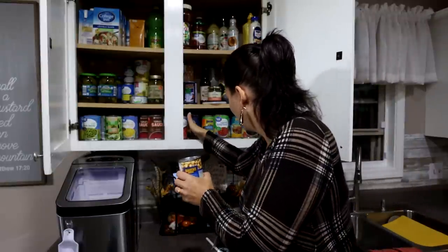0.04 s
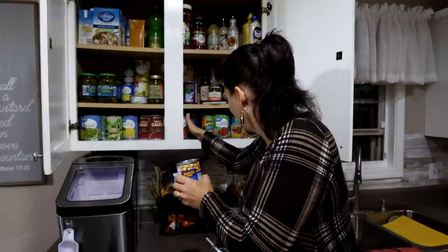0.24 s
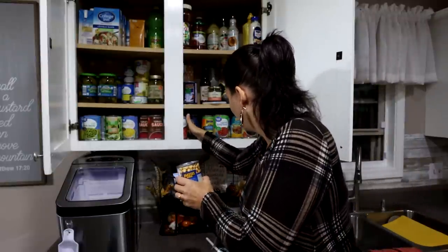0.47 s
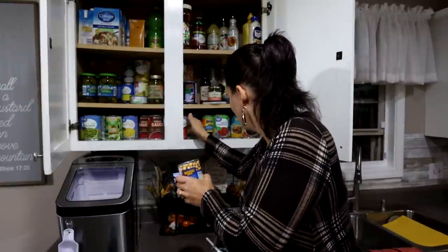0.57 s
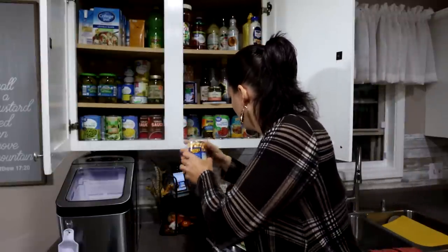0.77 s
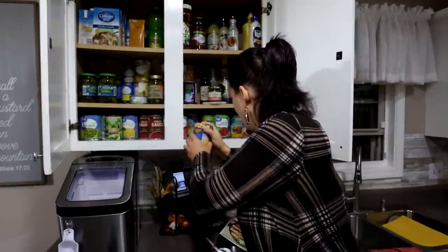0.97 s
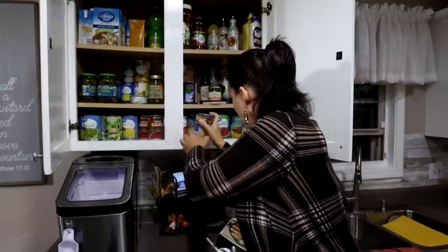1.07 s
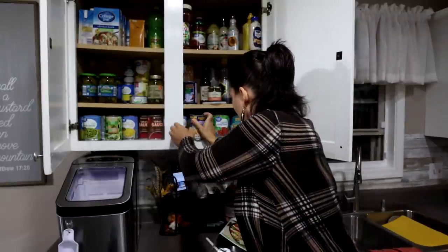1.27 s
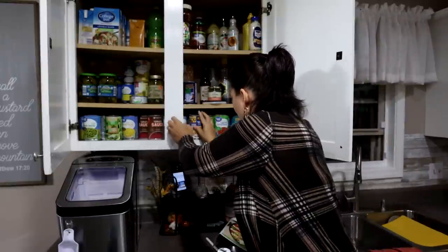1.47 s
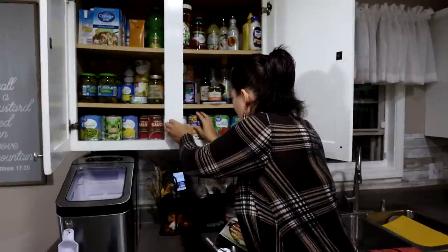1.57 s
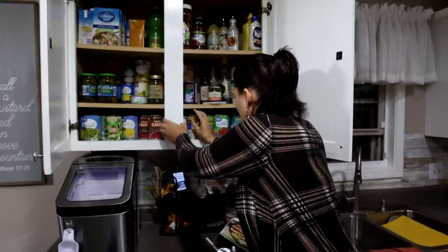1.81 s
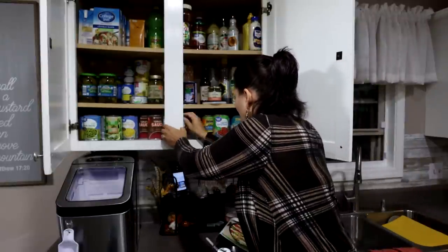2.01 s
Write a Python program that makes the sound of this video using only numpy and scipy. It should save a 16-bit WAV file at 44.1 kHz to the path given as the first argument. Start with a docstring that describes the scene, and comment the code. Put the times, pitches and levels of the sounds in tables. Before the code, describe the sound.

Metal cans and jars knock on a wooden cupboard shelf: a quick cluster of thuds first, a lighter clink, then heavier hollow clunks, with soft sliding, close to the microphone in a small, reflective kitchen.

```python
"""A small kitchen: cans and jars are set down and shuffled on a wooden cupboard shelf.
Each knock sounds shelf, room and cupboard resonances and the can's note, with a noise clatter.
Soft bumps, thin ticks, sliding, a sleeve's rustle and a sinking scrape are notes or shaped noise.
Room tone and an appliance's sine hum lie beneath; a noise tail makes the room's reflections.
The microphone flattens the loudest peaks."""
import sys
import numpy as np
from scipy import signal
from scipy.fft import rfft, irfft
from scipy.io import wavfile
from scipy.ndimage import uniform_filter1d

SR = 44100
rng = np.random.default_rng(int(sys.argv[2]) if len(sys.argv) > 2 else 0)


def persist_wave(psi):
    """Save psi, clipped to +-1, as 16-bit WAV."""
    counts = np.round(np.clip(psi, -1, 1) * 32767).astype(np.int16)
    wavfile.write(sys.argv[1], SR, np.atleast_2d(counts).T)


N = 90404
TIME_S = np.arange(N) / SR
EDGES_HZ = 28 * 2 ** np.arange(0, 9.6, .5)  # half-octave band edges

# room tone: (frequency [Hz], level [dB per band])
AIR_BANDS = [(30, -111), (60, -64.5), (100, -55.5), (200, -73.5), (600, -54.5), (1500, -67), (4000, -76),
             (8000, -79.5), (15000, -80)]
# appliance hum: (time [s], rms level before waver [dB])
HUM_CURVE = [(0, -81), (.7, -55), (1.0, -53.5), (1.25, -46), (1.45, -52), (2.05, -57.5)]
HUM_HZ, HUM_WAVER_DB = 385.5, 1

# sliding: (time [s], level [dB])
SLIDE_CURVE = [(0, -42), (.09, -42.5), (.15, -37.5), (.2, -37.5), (.26, -79), (.6, -50), (.8, -51.5),
               (.95, -51), (1.1, -52), (1.28, -45), (1.6, -46), (1.75, -36.5), (1.86, -53.5), (2.05, -60)]
# sliding colour: (frequency [Hz], relative level [dB per band])
SLIDE_BANDS = [(80, -2), (300, 0), (900, 5.5), (2000, -0.5), (4000, 2), (8000, -9), (15000, -31)]
SLIDE_COMMON_FLICKER_DB, SLIDE_BAND_FLICKER_DB = 1.65, 3.15

# soft bumps of a hand on a can: (time [s], level before swell [dB], pitch [Hz], t60 [s])
HAND_BUMPS = [(0.048, -19.5, 650, 0.034), (0.056, -23.5, 546, 0.043), (0.833, -23.5, 337, 0.051),
              (0.833, -27, 463, 0.025), (0.866, -31.5, 366, 0.056), (1.641, -21.5, 450, 0.18)]

# thin rustle of a sleeve: (time [s], level [dB])
RUSTLE_CURVE = [(0, -77), (.07, -62), (.17, -55), (.25, -83), (.8, -75), (.87, -60.5), (1.02, -61.5),
                (1.15, -68.5), (1.42, -63), (1.47, -61), (1.53, -71), (2.05, -100)]
RUSTLE_LOW_HZ, RUSTLE_GRAIN_DB = 6240, 1.5

# knocks: (time [s], thud [dB], wood [dB], clank [dB], clack [dB], tick [dB],
#          shelf pitch shift [semitones], can's own note [Hz], note level before swell [dB])
KNOCK_EVENTS = [(0.101, -23.5, -28, -35, -31.5, -33.5, 0.79, 676, -20),
                (0.123, -19.5, -28.5, -37, -39, -58, 0.023, 418, -24),
                (0.176, -17, -32, -38, -36, -43, 0.76, 680, -32),
                (0.195, -14, -14.5, -16, -17.5, -22.5, -0.17, 173.5, -3),
                (0.203, -25.5, -10.5, -20, -20.5, -31, 0.26, 632, -5),
                (0.210, -29, -8.5, -52, -44, -48, 0.025, 410, -27),
                (0.579, -30.5, -39, -37, -43, -51, -1.2, 670, -29),
                (0.591, -50, -16, -22, -25.5, -37, -0.22, 1182, -17.5),
                (1.29, -12.5, -11.5, -13.5, -20, -27.5, 0.92, 352, -7),
                (1.314, -12.5, -16.5, -24, -34, -48, -0.098, 354, -15),
                (1.374, -29, -14.5, -8, -16, -35, 0.18, 659.4, -3.5),
                (1.422, -20.5, -18.5, -14.5, -21.5, -43, 0.26, 945, -15),
                (1.629, -29, -21.5, -32.5, -31.5, -30, -0.64, 560, -17),
                (1.679, -27.5, -23, -21, -30, -29.5, -1.1, 960, -20),
                (1.697, -19, -20, -4, -11.5, -31.5, -0.73, 1081, -3.5),
                (1.717, -30, -11.5, -24.5, -22, -44, 0.57, 826, -19),
                (1.754, -26, -25.5, -23, -28, -61, 0.58, 1153, -24),
                (2.032, -35.5, -42, -24, -32, -33, 0.045, 1760, -46),
                (2.036, -50, -31, -26.5, -36, -44, -0.84, 584, -16)]
# where the five knock levels apply, thud to tick: (frequency [Hz])
KNOCK_COLOUR_HZ = [150, 520, 1250, 3000, 7500]
# loaded shelf: (frequency before shift [Hz], level relative to knock [dB], t60 [s])
SHELF_MODES = [(104.6, -7.5, 0.072), (175.4, 0, 0.062), (244.6, -8, 0.11), (289.4, -12.5, 0.047),
               (394, -2.5, 0.1), (493, -11, 0.1), (639.6, 3, 0.056), (687, 6.5, 0.062), (910, 8, 0.013),
               (1066.4, 0.5, 0.039), (1134, -14, 0.031), (1562, -1, 0.019), (1936, -17, 0.057),
               (2634, -21, 0.075)]
# room and cupboard resonances ringing on: (frequency [Hz], level relative to knock [dB], t60 [s])
ROOM_MODES = [(181.4, -4.5, 0.23), (249, -13.5, 0.36), (374.3, -7, 0.12), (648, -20, 0.14),
              (814, -4, 0.093), (854.4, -18, 0.2), (899.5, -18, 0.13), (1070, -18.5, 0.12),
              (1406, -15, 0.15), (1505, -21.5, 0.13), (1876, -20, 0.093), (3170, -18.5, 0.086),
              (5500, -11.5, 0.053), (8400, -24, .06)]
# dense short ring of the contact: (frequency [Hz], level relative to knock [dB], t60 [s])
CLATTER_BANDS = [(46.6, -39.5, 0.094), (123, -21.5, 0.18), (378, -9.5, 0.066), (880, -8, 0.15),
                 (1790, -6, 0.048), (3740, -9.5, 0.042), (6500, -9, 0.043), (14800, -23, 0.042)]
MODE_SCATTER_DB = 2
NOTE_T60_S, ATTACK_S, MAX_RING_S = 0.053, 0.00096, .45

# extra notes that start with or just after a knock, short or long:
# (time [s], level before swell [dB], pitch [Hz], t60 [s])
KNOCK_RINGS = [(0.102, -38, 97, .22), (0.196, -22, 138.5, .2), (0.203, -28, 680, 0.13),
               (0.591, -11, 652, 0.069), (0.591, -19.5, 1188, 0.052), (0.605, -35, 99, 0.21),
               (1.290, -7, 700, 0.032), (1.290, -17.5, 494, 0.12), (1.290, -26, 113, 0.15),
               (1.374, -20.5, 243.7, 0.31), (1.374, -24, 1085, 0.094), (1.697, -24, 319, 0.32),
               (1.697, -21.5, 99, 0.11), (1.697, -16.5, 917, .2)]

# can sliding into the next: (time [s], level [dB], pitch [Hz])
SCRAPE_CURVE = [(.4, -78, 3700), (.46, -62, 3530), (0.539, -60, 3110), (.575, -63, 2900), (.6, -85, 2900)]
SCRAPE_LOWPASS_HZ = 120  # half-width of the hiss band

# light rim ticks: (time [s], level [dB])
RIM_TICKS = [(0.663, -49.5), (0.833, -56), (0.867, -49.5), (0.878, -49), (0.888, -55), (1.392, -40.5)]
TICK_T60_S, TICK_LOW_HZ, TICK_HIGH_HZ = 0.046, 3570, 9000

# kitchen reflections: (frequency [Hz], level against direct sound [dB per Hz], t60 [s])
ROOM_BANDS = [(48.3, -10.5, 0.63), (106, -5.5, 0.2), (306, -7, 0.48), (700, -9.5, 0.39), (1350, -8, .48),
              (2850, -6.5, 0.47), (6900, -11.5, 0.25), (14900, -20.5, 0.35)]
ROOM_DELAY_S, ROOM_BUILD_S = 0.0024, 0.014
ROOM_GRAIN_DB, ROOM_EVEN_HZ = 2.0, 35  # unevenness in time; width of colour smoothing

LOW_CUT_HZ, CUTOFF_HZ = 70, 16000
OVERLOAD_PEAK = 1.05


def from_db(db):
    """Decibels to amplitude gain."""
    return 10 ** (np.asarray(db) / 20)


def at_hz(rows, hz, axis=1):
    """Read one table column on a log-frequency axis."""
    rows = np.array(rows)
    return np.interp(np.log(hz), np.log(rows[:, 0]), rows[:, axis])


def level(rows):
    """A (time [s], level [dB]) curve as gain per sample."""
    return from_db(np.interp(TIME_S, *np.transpose(rows)))


def drift(count):
    """Random wander about 0: straight lines through count unit-normal points."""
    points_s = np.linspace(0, N / SR, count)
    return np.interp(TIME_S, points_s, rng.standard_normal(count))


def band_pass(x, low_hz, high_hz):
    """Causal Butterworth band."""
    sos = signal.butter(2, [low_hz, high_hz], "band", fs=SR, output="sos")
    return signal.sosfilt(sos, x)


def noise_bands():
    """Half-octave noise, unit deviation: (centre [Hz], share of full bandwidth, noise)."""
    for low_hz, high_hz in zip(EDGES_HZ, EDGES_HZ[1:]):
        band = band_pass(rng.standard_normal(N + 8000), low_hz, high_hz)[-N:]  # skip filter onset
        yield np.sqrt(low_hz * high_hz), 2 * (high_hz - low_hz) / SR, band / band.std()


def clicks(times_s, db):
    """One impulse per contact."""
    out = np.full(N, 1e-18)  # tiny floor
    index = np.clip(np.round(times_s * SR).astype(int), 0, N - 1)
    np.add.at(out, index, from_db(db))
    return out


def fade(t60_s):
    """Gain per sample of a ring that falls 60 dB in t60_s."""
    return np.exp(-np.log(1000) / (t60_s * SR))


def die_away(x, t60_s):
    """Each click opens an exponentially decaying envelope."""
    return signal.lfilter([1], [1, -fade(t60_s)], x)


def add(out, start_s, sound):
    """Mix a sound in at its time."""
    start = int(np.clip(round(start_s * SR), 0, N - 1))
    out[start:start + len(sound)] += sound[:N - start]


def mode(hz, db, t60_s):
    """A sine that swells during contact while it decays."""
    t_s = TIME_S[:int(min(1.5 * t60_s, MAX_RING_S) * SR) + 1]
    swell = 1 - np.exp(-t_s / ATTACK_S)
    decay = np.exp(-np.log(1000) * t_s / t60_s)
    return from_db(db) * np.sin(2 * np.pi * hz * t_s) * swell * decay


def strength_db(colour_db, hz):
    """How hard a knock drives this frequency."""
    return np.interp(np.log(hz), np.log(KNOCK_COLOUR_HZ), colour_db)


def background():
    """Band-shaped noise as room tone, a wavering sine as appliance hum."""
    air = sum(noise * from_db(at_hz(AIR_BANDS, hz)) for hz, _, noise in noise_bands())
    hum = np.sqrt(2) * np.sin(2 * np.pi * HUM_HZ * TIME_S)  # rms 1
    waver = from_db(HUM_WAVER_DB * drift(20))
    return air + hum * level(HUM_CURVE) * waver


def sliding():
    """Tins and a sleeve rub along the shelf: noise bands flicker together and apart."""
    common_db = SLIDE_COMMON_FLICKER_DB * drift(120)
    rub = np.zeros(N)
    for hz, _, noise in noise_bands():
        flicker_db = common_db + SLIDE_BAND_FLICKER_DB * drift(60)
        rub += noise * from_db(at_hz(SLIDE_BANDS, hz) + flicker_db)
    return rub / rub.std() * level(SLIDE_CURVE)


def notes(rows):
    """Single decaying notes: soft bumps of a hand, or extra notes around a knock."""
    out = np.zeros(N)
    for start_s, db, hz, t60_s in rows:
        add(out, start_s, mode(hz, db, t60_s))
    return out


def rustle():
    """A sleeve brushes the shelf edge: treble noise with a fine, grainy level."""
    hiss = band_pass(rng.standard_normal(N), RUSTLE_LOW_HZ, CUTOFF_HZ)
    hiss = hiss * from_db(RUSTLE_GRAIN_DB * drift(500))
    return hiss / hiss.std() * level(RUSTLE_CURVE)


def knocks():
    """Each blow rings the shelf, shifted in pitch by its load, fixed resonances and the can's note."""
    out = np.zeros(N)
    for start_s, *colour_db, semitones, note_hz, note_db in KNOCK_EVENTS:
        shift = 2 ** (semitones / 12)
        shelf = [(hz * shift, db, t60_s) for hz, db, t60_s in SHELF_MODES]
        for k, (hz, db, t60_s) in enumerate(shelf + ROOM_MODES):
            scatter_db = MODE_SCATTER_DB * rng.standard_normal()
            ring = mode(hz, db + strength_db(colour_db, hz) + scatter_db, t60_s)
            add(out, start_s, (-1) ** k * ring)  # alternate polarity
        add(out, start_s, mode(note_hz, note_db, NOTE_T60_S))
    return out


def clatter():
    """Countless short modes of each knock as noise bursts, each band with its own decay."""
    out = np.zeros(N)
    times_s = np.array([row[0] for row in KNOCK_EVENTS])
    for low_hz, high_hz in zip(EDGES_HZ, EDGES_HZ[1:]):
        hz = np.sqrt(low_hz * high_hz)
        band_db = at_hz(CLATTER_BANDS, hz)
        db = [strength_db(colour_db, hz) + band_db for _, *colour_db, _, _, _ in KNOCK_EVENTS]
        envelope = die_away(clicks(times_s, db), at_hz(CLATTER_BANDS, hz, axis=2))
        burst = envelope * rng.standard_normal(N)
        # make up the power lost to the narrow band
        out += band_pass(burst, low_hz, high_hz) * np.sqrt(SR / (2 * (high_hz - low_hz)))
    return out


def scrape():
    """A thin band of hiss that sinks in pitch as the can slows."""
    times_s, db, hz = np.transpose(SCRAPE_CURVE)
    low_pass = signal.butter(2, SCRAPE_LOWPASS_HZ, fs=SR, output="sos")
    rub = signal.sosfilt(low_pass, rng.standard_normal((2, N)))
    phase = 2 * np.pi * np.cumsum(np.interp(TIME_S, times_s, hz)) / SR
    hiss = rub[0] * np.cos(phase) + rub[1] * np.sin(phase)
    return hiss / hiss.std() * from_db(np.interp(TIME_S, times_s, db))


def ticks():
    """Rims graze each other: bright noise under short decays."""
    band = signal.butter(1, [TICK_LOW_HZ, TICK_HIGH_HZ], "band", fs=SR, output="sos")
    bright = signal.sosfilt(band, rng.standard_normal(N))
    envelope = die_away(clicks(*np.transpose(RIM_TICKS)), TICK_T60_S)
    return bright / bright.std() * envelope


def kitchen(x):
    """Uneven reflections build up quickly and die away band by band."""
    build = np.clip((TIME_S - ROOM_DELAY_S) / ROOM_BUILD_S, 0, 1)
    tail = np.zeros(N)
    for hz, share, noise in noise_bands():
        decay = fade(at_hz(ROOM_BANDS, hz, axis=2)) ** np.arange(N)
        tail += noise * np.sqrt(share) * decay
    response = rfft(tail * build * from_db(ROOM_GRAIN_DB * drift(600)))
    hz = np.maximum(np.arange(len(response)) * SR / N, 1)
    # even out the smoothed spectrum, then give it the room's colour
    power = uniform_filter1d(np.abs(response) ** 2, int(ROOM_EVEN_HZ * N / SR) + 1)
    colour = np.sqrt(power + 1e-9)
    tail = irfft(response / colour * from_db(at_hz(ROOM_BANDS, hz)), N) * build
    return signal.fftconvolve(x, tail[:N // 2])[:N]


def scene():
    """Cupboard with reflections, plus scrape and background without them."""
    cupboard = knocks() + clatter() + notes(HAND_BUMPS) + notes(KNOCK_RINGS)
    cupboard = cupboard + ticks() + sliding() + rustle()
    return (cupboard + kitchen(cupboard) + scrape() + background())[None]


def record(dry):
    """The microphone thins deep bass, flattens the loudest peaks and cuts the top."""
    high_pass = signal.butter(2, LOW_CUT_HZ, "high", fs=SR, output="sos")
    thin = signal.sosfilt(high_pass, dry)
    limited = thin / (1 + (thin / OVERLOAD_PEAK) ** 8) ** (1 / 8)
    top_cut = signal.ellip(10, .1, 70, CUTOFF_HZ, fs=SR, output="sos")
    return signal.sosfilt(top_cut, limited)


dry = scene()
out = record(dry)
persist_wave(out)
```